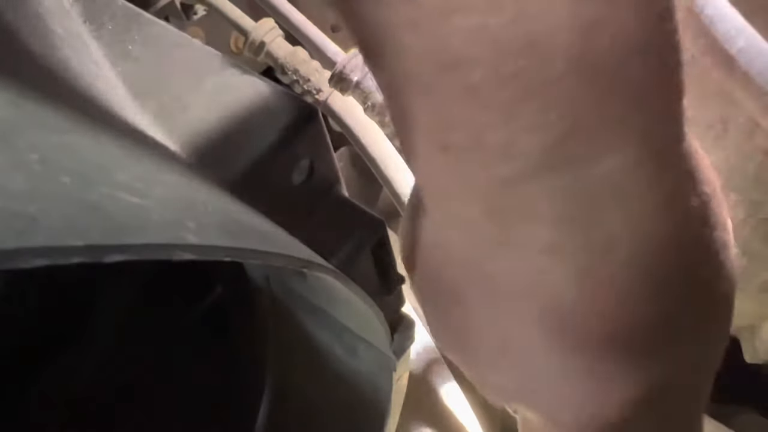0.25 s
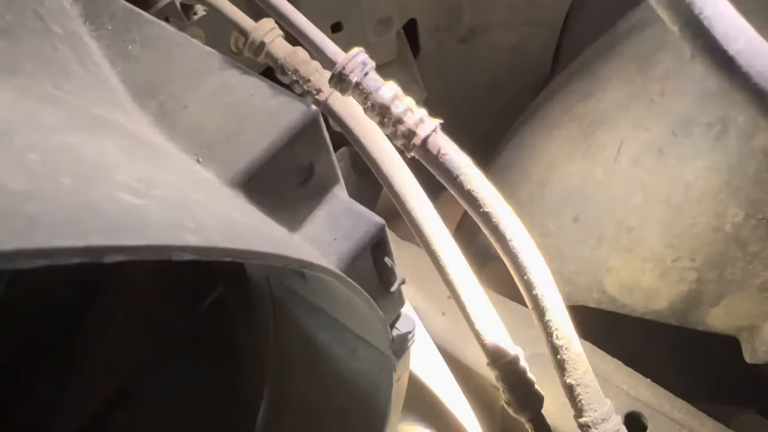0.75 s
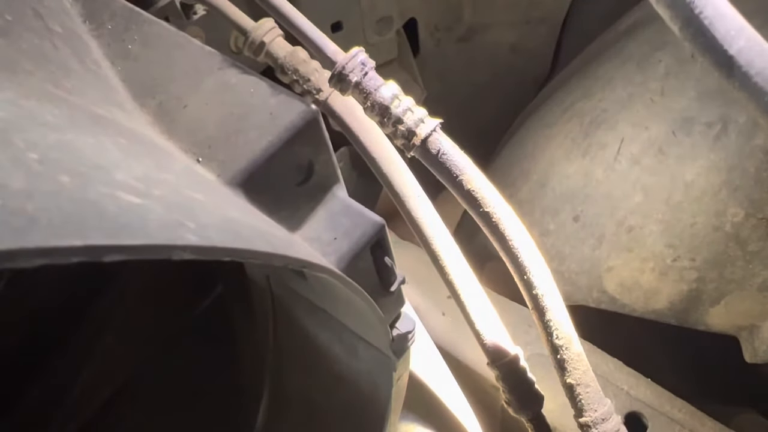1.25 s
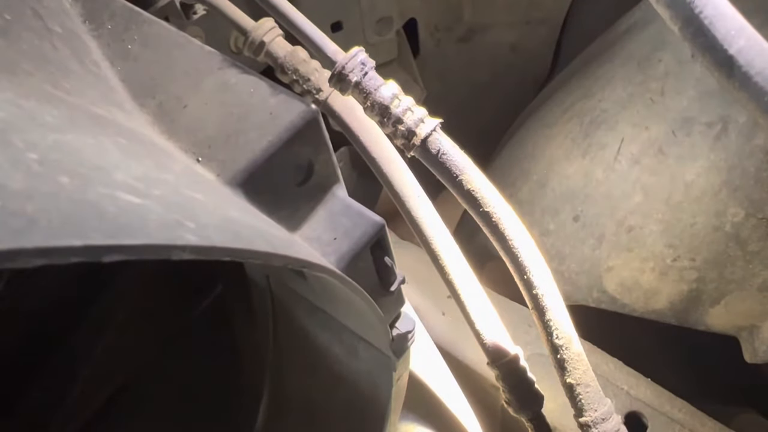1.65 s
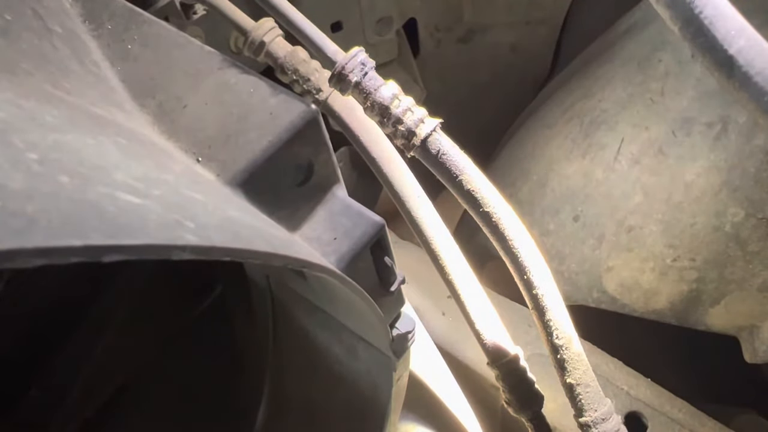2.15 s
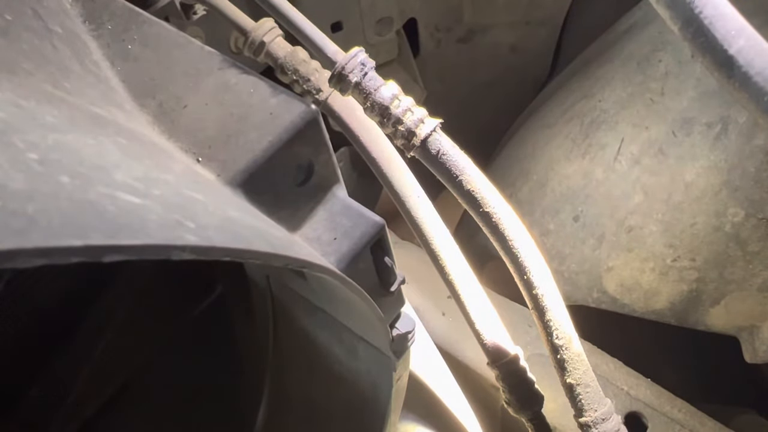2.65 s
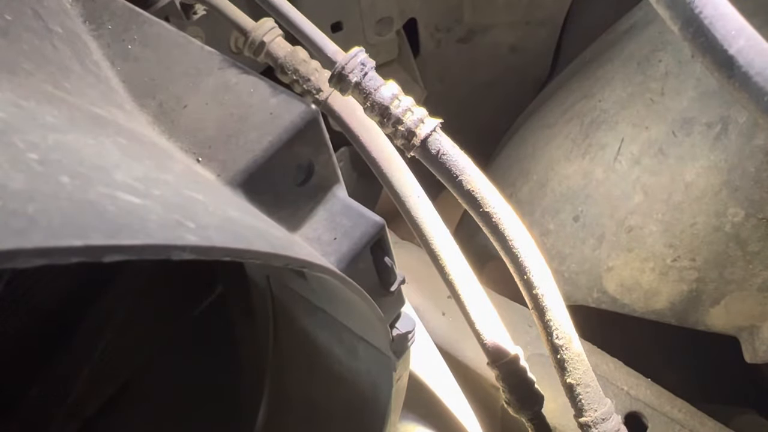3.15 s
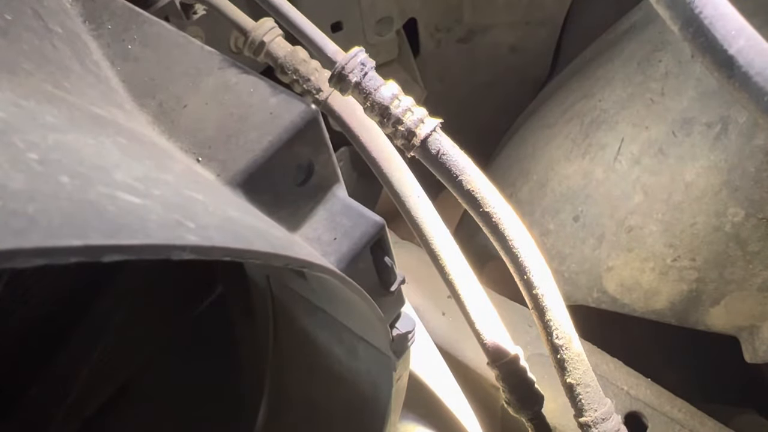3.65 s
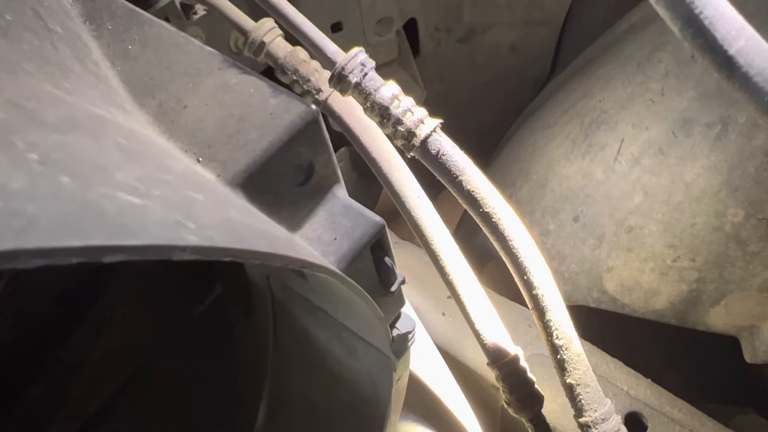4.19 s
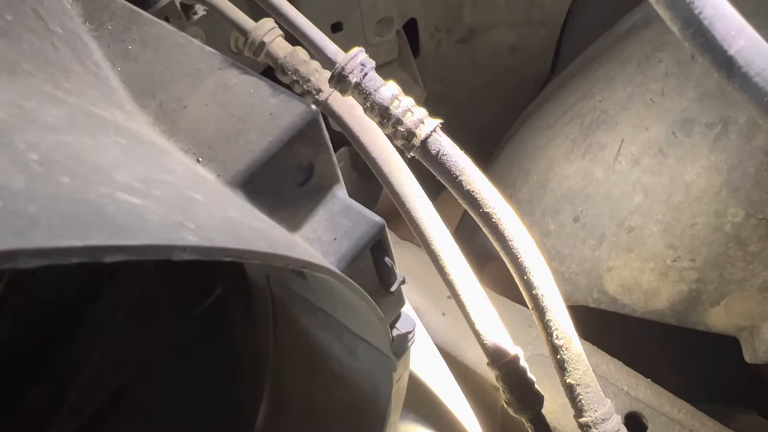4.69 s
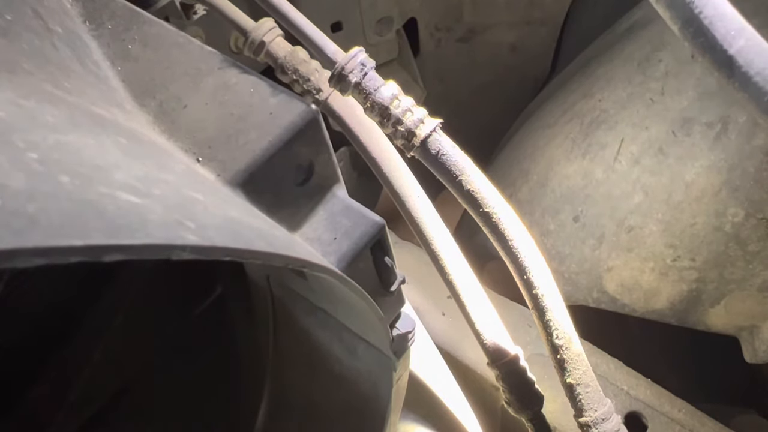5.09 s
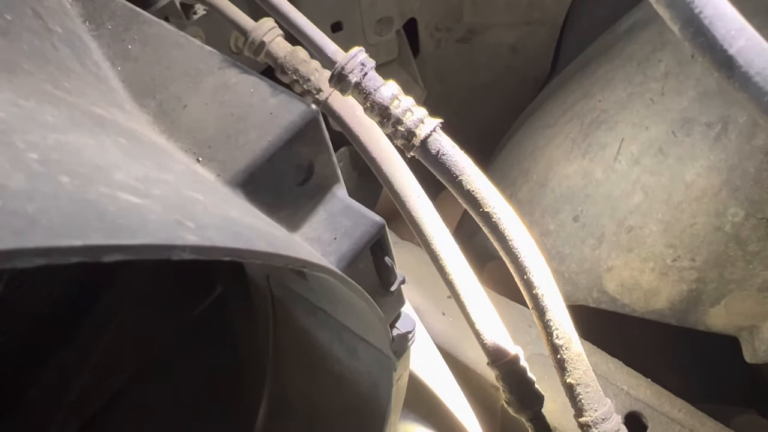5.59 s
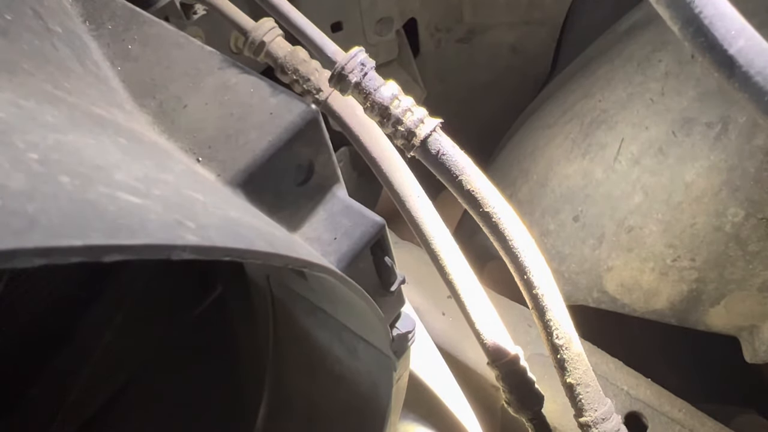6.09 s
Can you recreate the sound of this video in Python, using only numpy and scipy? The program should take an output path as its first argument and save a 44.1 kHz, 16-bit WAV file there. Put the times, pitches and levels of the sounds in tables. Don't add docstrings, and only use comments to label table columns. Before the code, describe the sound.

Compressed air hisses steadily close by under a car, two sharp metallic snaps ring out, then heavy knocks on panels as the tool is moved.

```python
import sys
import numpy as np
from scipy import signal
from scipy.io import wavfile
from scipy.ndimage import uniform_filter1d

SR = 44100
rng = np.random.default_rng(int(sys.argv[2]) if len(sys.argv) > 2 else 0)


def decibels_to_gain(level_db):
    exponent = np.asarray(level_db, float) / 20
    return 10 ** exponent


def dump_mix(stems):
    frames = np.atleast_2d(stems).T
    limited = np.clip(frames, -1, 1)
    pcm = np.round(limited * 32767).astype(np.int16)
    wavfile.write(sys.argv[1], SR, pcm)


N = 279153
HZ = np.fft.rfftfreq(1024, 1 / SR)
FRAME_S = np.arange(N // 256 + 5) * 256 / SR

# [t/s, aim at camera level/dB, aim into hollow level/dB, lifted/0-1, pitch factor]
NOZZLE = [(0, 0, -1, 0.01, 0.99), (.85, 0.7, 1, 0.01, 1), (1.4, 0, -0.5, 0.02, 1), (3.82, -0.5, 0, 0.01, 1),
          (3.92, 5.5, -2, 0, .93), (4.09, 5.5, 1.5, 0, .96), (4.22, 5.5, 2, 0, 0.96),
          (4.32, 7.5, 1, 0, 0.97), (4.43, 0.5, 2.5, 0, 0.97), (4.66, -3, -1.5, 0.64, 0.83),
          (4.72, -2, 7, 1, 0.906), (4.9, -5, 7, .99, 0.91), (5.15, -8.5, 7.5, 0.96, 1),
          (5.37, -4, 1, .9, 0.92), (5.8, -2, -6.5, 0.76, 0.88), (5.95, 0.5, -2, 0.72, 0.95),
          (6.15, 7.5, -6.5, 0.67, 0.92), (6.33, 5, 1, .99, 0.97)]
# [lower f/Hz, upper f/Hz]
JET_BANDS = [(4700, 6900), (2300, 3800), (6900, 8500), (11000, 15800)]
# [rest level/dB, camera aim share, hollow aim share, lifted level/dB]
JET_RULE = [(-40, 1, 0.2, 0.5), (-46, 0.46, 1, 0), (-43.5, 0.72, .3, -1.5), (-49.5, 0.57, 0.12, 5.5)]
# [f/Hz, width f/Hz, left level/dB, right level/dB]
REST = [(1680, 860, -73.5, -73), (2620, 230, -72.5, -69.5), (2830, 35, -76.5, -59.5),
        (3192, 55, -70, -74.5), (3570, 600, -69.5, -67.5), (4000, 1200, -75, -100),
        (5130, 310, -69.5, -74.5), (5953, 480, -68, -76), (6516, 410, -66, -80), (7270, 770, -75, -71),
        (7890, 550, -70, -78.5)]
# [f/Hz, width f/Hz, left level/dB, right level/dB]
REST_TOP = [(9900, 700, -77, -77), (10900, 800, -79, -79), (12200, 500, -81, -81), (13700, 800, -80, -80),
            (14600, 500, -84, -84), (15500, 600, -83, -83)]
# [f/Hz, width f/Hz, left level/dB, right level/dB]
LIFTED = [(1720, 920, -69.5, -63), (2680, 1400, -86, -76), (3070, 1170, -67, -61), (3980, 1200, -81, -75),
          (5480, 740, -72, -91), (5780, 730, -69.5, -68.5), (6440, 600, -68, -75), (7340, 3000, -98, -71.5),
          (8150, 1300, -87, -69.5)]
# [f/Hz, width f/Hz, left level/dB, right level/dB]
LIFTED_TOP = [(10000, 900, -80, -80), (11300, 900, -75, -75), (14200, 900, -77, -77),
              (15650, 500, -75, -75)]
# (rest f/Hz, rest level/dB, share of the aim, lifted level/dB)
WHISTLE, HOLLOW = (6471, -5.5, 1.45, -10), (3128, 6.97, 0.51, 2.3)
# [rest f/Hz, rest level/dB, share of the aim, lifted level/dB]
UNDERTONE = (5400, -7, 1.7, -4)
# [f/Hz, width f/Hz, rest depth/0-1, lifted depth/0-1]
VALLEYS = [(3590, 70, 0.55, 0), (3930, 62, 0.45, 0.4), (9050, 170, 0.85, 0.25), (10380, 460, 0.09, 0.97),
           (13400, 72, 0.6, 0), (13850, 260, 0.05, 0.7)]
# [f/Hz, likeness/0-1]
SAME = [(60, .95), (500, .9), (1100, .7), (2500, .92), (3400, .92), (4400, .6), (5500, .8), (6300, .65),
        (7400, .88), (9100, .7), (9800, .98), (10800, .98), (11800, .8), (12500, .99), (14200, .98),
            (15500, .8)]
PORT_LAG_S, TOP_LAG_S, KNOCK_LAG_S, TOP_HZ = 4.4e-4, 1.46e-4, 6e-4, 9300
PAN_DB, PAN_LIFTED_DB, LAG, LAG_LIFTED = 3.5, 6, 0.96, -0.051

SNAPS_S = [2.0134, 2.2575]
# [ring level/dB, right ring level/dB, crack level/dB, crack t60/s]
SNAPS = [
    (8, -13.5, -21, .008),
    (-7, -26, -18, 0.023),
]
# [f/Hz, level/dB, t60/s]
FITTING = [(2740, -23, .03), (3289, -21, .025), (4129, -20, .02), (5340, 0, .017), (5630, 0, .017),
           (5880, -14, .02)]

# [t/s, boom level/dB, boom f/Hz, shell level/dB, shell f/Hz]
HARD = [
    (.002, -51, 152, -40, 1455),
    (0.033, -59, 150, -42, 1525),
    (3.229, -58, 200, -48, 610),
    (3.391, -74, 200, -45.5, 613),
    (3.949, -28.5, 105, -41, 493),
    (4.1064, -12, 220, -30, 525),
    (4.46, -44, 198, -42, 720),
    (5.241, -55, 200, -44, 495),
    (5.743, -50, 122, -44, 447),
    (5.9061, -26.5, 218, -19, 477),
]
# [t/s, boom level/dB, boom f/Hz, shell level/dB, shell f/Hz]
SOFT = [(0.076, -34, 208, -55, 450), (2.801, -74, 202, -43.5, 462), (4.123, -19.5, 85, -13.5, 423),
        (4.152, -20.5, 160, -23.5, 608), (4.175, -25, 73, -33, 463), (4.203, -34, 202, -20, 530),
        (4.26, -18, 247.4, -18.5, 471), (4.29, -25.5, 199, -36, 525), (4.738, -71, 200, -41.5, 488),
        (5.821, -32.5, 327, -17, 586), (5.849, -51, 282, -26, 585), (5.955, -35.5, 172, -26.5, 617),
        (6.228, -39, 107, -32, 587), (6.244, -41, 131, -30, 462)]
# [ratio to its pitch, level/dB, t60/s]
BOOM = [(.6, -18, 0.24), (1, 2.5, 0.078), (1.2, -2, 0.1)]
# [ratio to its pitch, level/dB, t60/s]
SHELL = [(.76, -3, .06), (1, 0, .07), (1.2, -5, .05), (1.43, -3, .04), (2.03, -8, .04)]
# [f/Hz, level/dB, t60/s]
TICK = [(850, -2, .012), (1250, -3, .012), (1610, -5, .02), (2150, -5, .008), (2900, -13, .006)]
RATTLE_T60 = [0.0034, 0.11, 0.069]
HARD_TICK_DB, SOFT_TICK_DB = 4.8, -32
HARD_BLOW_DB, SOFT_BLOW_DB, BLOW_S = 6, -1, 0.00096

# [start t/s, length t/s, level/dB, brightness level/dB per band]
RUBS = [(0, .05, -53, -1.5), (.07, 0.12, -52, -6), (.2, 0.41, -64, 2), (0.635, 0.086, -62.5, 9.5),
        (.77, 0.14, -62, 12.5), (.86, 0.089, -50, -3), (1.146, 0.14, -61, 5), (1.724, .1, -86, 3),
        (1.975, .06, -68, 11), (2.24, 0.079, -61.5, 3), (2.707, 0.31, -64, 2), (3.24, 0.28, -61.5, 7.5),
        (3.538, 0.58, -64.5, 1.5), (3.956, 0.089, -44, -10.5), (4.121, 0.092, -36.5, -10),
        (4.253, 0.35, -52.5, -7), (4.712, .1, -58.5, 6), (4.85, 0.34, -65.5, 1), (5.237, .14, -55, 1.5),
        (5.414, 0.3, -70.5, -10), (5.747, 0.27, -51, -1), (5.93, 0.026, -48, 10.5),
        (5.976, 0.32, -51.5, -1)]
# [lower f/Hz, upper f/Hz]
DRAG_BANDS = [(35, 140), (140, 500), (500, 1300)]
RUB_RISE_S, RUB_FADE_DB_PER_S, RUB_BODY_DB = 0.033, 289, -0.5
SCRAPE_HZ, SCRAPE_WIDTH_HZ, SCRAPE_DB = 1260, 300, 2.5
HUM_DB = [-68, -70, -62]

DUCK_FROM_DB, DUCK_SHARE, DUCK_BACK_DB_PER_S, DUCK_LAG_S = -7.5, 1, 71, 0.12
EDGE_HZ = 15850


def jet():
    s, *controls = np.transpose(NOZZLE)
    aim_db, cup_db, moved, pitch = (np.interp(FRAME_S, s, c) for c in controls)
    moved, hz = np.clip(moved, 0, 1), HZ[:, None]
    rest = hollows(REST + REST_TOP, -106) * comb(-13.0)
    lifted = hollows(LIFTED + LIFTED_TOP, -82) * comb(-15)
    power = rest[..., None] * (1 - moved) + lifted[..., None] * moved
    power = power / (1 + (1100 / (hz + 1)) ** 6)
    sliding = [(UNDERTONE, aim_db, 260), (WHISTLE, aim_db, 250), (HOLLOW, cup_db, 340)]
    for (rest_hz, rest_db, share, up_db), steer_db, width_hz in sliding:
        peak_db = rest_db + share * steer_db + up_db * moved
        power = power * (1 + decibels_to_gain(2 * peak_db) / (1 + ((hz - rest_hz * pitch) / width_hz) ** 2) ** 2)
    for valley_hz, width_hz, at_rest, when_lifted in VALLEYS:
        depth = np.clip(at_rest * (1 - moved) + when_lifted * moved, 0, .95)
        power = power * (1 - depth / (1 + ((hz - valley_hz * pitch) / width_hz) ** 2)) ** 2
    levels = [db + a * aim_db + c * cup_db + up_db * moved for db, a, c, up_db in JET_RULE]
    size = follow(power, np.transpose([FRAME_S] + levels), JET_BANDS)
    below_top = hz < TOP_HZ
    pan_db = PAN_DB + PAN_LIFTED_DB * moved
    size = size * decibels_to_gain(np.outer([.5, -.5], pan_db)[:, None] * below_top)
    same = likeness() * (1 - .25 * moved * below_top)
    patchy_db = 1.39 + 2.0 * (hz > 8300) + 1.7 * moved
    lag_s = np.where(below_top, PORT_LAG_S * (LAG + LAG_LIFTED * moved), TOP_LAG_S)
    return decibels_to_gain(3.5) * turbulence(size, same, lag_s, patchy_db, flicker_db=0.45)


def hollows(modes, floor_db):
    hz, width, *side_db = np.transpose(modes)[..., None]
    shape = 1 / (1 + (2 * (HZ - hz) / width) ** 2) ** 1.396
    return np.array([(decibels_to_gain(2 * db) * shape).sum(0) + decibels_to_gain(2 * floor_db) for db in side_db])


def comb(echo_db, count=14):
    delay_s = rng.uniform(0.001001, .009, (2, 1, count))
    sign = rng.choice([-1, 1], (2, 1, count))
    echoes = (sign * np.exp(-2j * np.pi * HZ[:, None] * delay_s)).sum(2)
    return np.where(HZ < TOP_HZ, abs(1 + decibels_to_gain(echo_db) * echoes) ** 2, 1)


def follow(power, rows, bands):
    s, *level_db = np.transpose(rows)
    order = np.argsort([lo for lo, hi in bands])
    has = [power[:, (HZ > lo) & (HZ < hi)].mean(0).sum(0) for lo, hi in bands]
    lift_db = np.array([np.interp(FRAME_S, s, level_db[k]) - 10 * np.log10(has[k]) for k in order])
    centre = np.log([np.sqrt(np.prod(bands[k])) for k in order])
    weights = np.array([np.interp(np.log(HZ + 1), centre, one) for one in np.eye(len(bands))])
    return np.sqrt(power) * decibels_to_gain(weights.T @ lift_db)


def likeness():
    hz, same = np.transpose(SAME)
    return np.clip(np.interp(np.log(HZ + 1), np.log(hz), same), 0, 1)[:, None]


def evened(x):
    return x / np.sqrt(np.mean(x ** 2) + 1e-20)


def turbulence(size, same, lag_s, patchy_db, flicker_db):
    a, b, c, d, patches = rng.standard_normal((len(FRAME_S), len(HZ), 5)).T
    patches = uniform_filter1d(patches, size=5, axis=0)
    patches = evened(uniform_filter1d(patches, size=14, axis=1))
    flicker = evened(uniform_filter1d(rng.standard_normal(len(FRAME_S)), size=3))
    left, own = a + 1j * b, c + 1j * d
    late = np.exp(-2j * np.pi * HZ[:, None] * lag_s)
    right = same * late * left + np.sqrt(1 - same ** 2) * own
    z = np.array([left, right]) * size * decibels_to_gain(patchy_db * patches + flicker_db * flicker)
    return signal.istft(z, nperseg=1024, noverlap=768)[1][:, :N]


def snap(ring_db, far_db, crack_db, t60):
    t = np.arange(SR // 8) / SR
    rise = 1 - np.exp(-t / .0009)
    steel = np.array([decibels_to_gain(ring_db) * ring(FITTING, t), decibels_to_gain(far_db) * ring(FITTING, t, 1.02, 6.2)]) / 2
    shared, own = rng.standard_normal((2, len(t)))
    place = np.arange(len(t))
    late = np.interp(place - TOP_LAG_S * SR, place, shared, left=0)
    fade = decibels_to_gain(-60 * t / t60) + decibels_to_gain(-21 - 60 * t / 0.2)
    crack = np.array([shared, late + 0.87 * own]) * fade
    crack = signal.lfilter(*signal.butter(1, [800, 17000], "bandpass", fs=SR), crack)
    return rise * steel + decibels_to_gain(crack_db) * crack * decibels_to_gain(np.array([[0], [-1.5]]))


def ring(modes, t, unit_hz=1, stretch=1):
    return sum(decibels_to_gain(db - 60 * t / (t60 * stretch)) * np.sin(2 * np.pi * f * unit_hz * t) for f, db, t60 in modes)


def knock(boom_db, boom_hz, shell_db, shell_hz, tick_db, blow_db):
    t = np.arange(SR // 3) / SR
    panel = ring(BOOM, t, boom_hz) * (1 - np.exp(-t / 0.0034))
    rings = [panel, ring(SHELL, t, shell_hz), ring(TICK, t)]
    rattle, own = rng.standard_normal(len(t)), rng.standard_normal((2, len(t)))
    drive = (rattle + .4 * own) * (1 - np.exp(-t / .001))
    drive = drive + decibels_to_gain(blow_db) * np.sin(np.pi * np.minimum(t / BLOW_S, 1))
    levels_db, lows_hz = (boom_db, shell_db, tick_db), (40, 0.83 * shell_hz, 550)
    sound = 0
    for db, r, rattle_t60, low_hz in zip(levels_db, rings, RATTLE_T60, lows_hz):
        part = signal.fftconvolve(drive * decibels_to_gain(-60 * t / rattle_t60), r[None])[:, :len(t)]
        part = signal.sosfilt(signal.butter(2, low_hz, "highpass", fs=SR, output="sos"), part)
        sound = sound + decibels_to_gain(db) * part / abs(part).max()
    lag = round(KNOCK_LAG_S * SR)
    right = np.r_[np.zeros(lag), sound[1, :-lag]]
    return np.array([sound[0] * decibels_to_gain(1.66), right * decibels_to_gain(-1.0)])


def drag():
    slope = 1 / (1 + (45 / (HZ + 1)) ** 4) / (1 + (HZ / 1480) ** 8) / (HZ + 60)
    power = np.ones((2, 1, len(FRAME_S))) * slope[:, None]
    ribs = 1 + decibels_to_gain(2 * SCRAPE_DB) / (1 + ((HZ - SCRAPE_HZ) / SCRAPE_WIDTH_HZ) ** 2) ** 2
    rubbing = follow(power * ribs[:, None], rubs(), DRAG_BANDS)
    hum = follow(power, [(0, *HUM_DB), (N / SR, *HUM_DB)], DRAG_BANDS)
    size = np.hypot(rubbing, hum)
    return decibels_to_gain(-1.0) * turbulence(size, likeness(), PORT_LAG_S, patchy_db=2.5, flicker_db=1.0)


def rubs():
    start, length, db, bright_db = np.transpose(RUBS)[..., None]
    t = FRAME_S - start
    fade_db = RUB_FADE_DB_PER_S * np.maximum(t - length, 0)
    stroke = np.clip(t / RUB_RISE_S + 1, 0, 1) * decibels_to_gain(db - fade_db)
    tilts_db = (-bright_db, RUB_BODY_DB, bright_db)
    levels_db = [10 * np.log10(((stroke * decibels_to_gain(d)) ** 2).sum(0) + 1e-12) for d in tilts_db]
    return np.transpose([FRAME_S] + levels_db)


def add(mix, s, sound):
    part = mix[:, round(s * SR):][:, :sound.shape[1]]
    part += sound[:, :part.shape[1]]


def scene():
    mix = jet() + drag()
    rows = [(*row, HARD_TICK_DB, HARD_BLOW_DB) for row in HARD]
    rows += [(*row, SOFT_TICK_DB, SOFT_BLOW_DB) for row in SOFT]
    for s, boom_db, boom_hz, shell_db, shell_hz, tick_db, blow_db in sorted(rows):
        bracket_db = max(boom_db, shell_db) + tick_db
        add(mix, s, knock(boom_db, boom_hz, shell_db, shell_hz, bracket_db, blow_db))
    for s, row in zip(SNAPS_S, SNAPS):
        add(mix, s, snap(*row))
    return mix


def duck(x):
    back_db = np.arange(N) * DUCK_BACK_DB_PER_S / SR
    peak_db = 20 * np.log10(abs(x).max(0) + 1e-9)
    held_db = np.maximum.accumulate(peak_db + back_db) - back_db
    over_db = np.maximum(held_db - DUCK_FROM_DB, 0)
    keep = np.exp(-1 / (DUCK_LAG_S * SR))
    return x / decibels_to_gain(DUCK_SHARE * signal.lfilter([1 - keep], [1, -keep], over_db))


def band_limit(x):
    return signal.sosfilt(signal.butter(12, 17010, fs=SR, output="sos"), x)


def record(dry):
    thin = signal.sosfilt(signal.butter(2, 55, "highpass", fs=SR, output="sos"), duck(dry))
    edge = signal.firwin(511, EDGE_HZ, window=("kaiser", 5), fs=SR)
    mix = signal.oaconvolve(thin, edge[None], "same")
    return band_limit(mix)


dry = scene()
out = record(dry)
dump_mix(out)
```